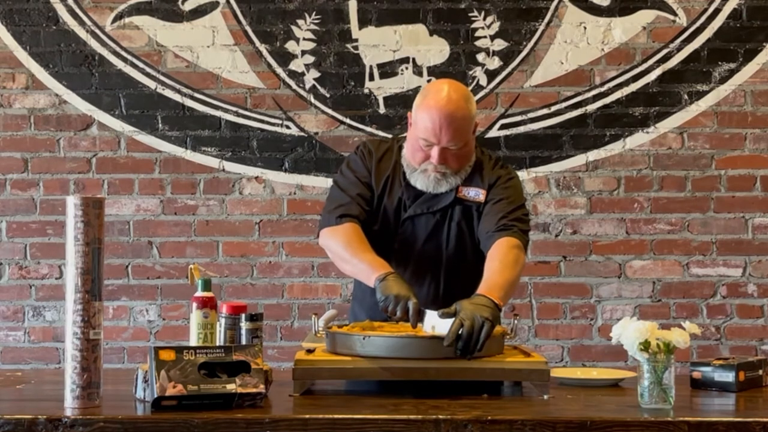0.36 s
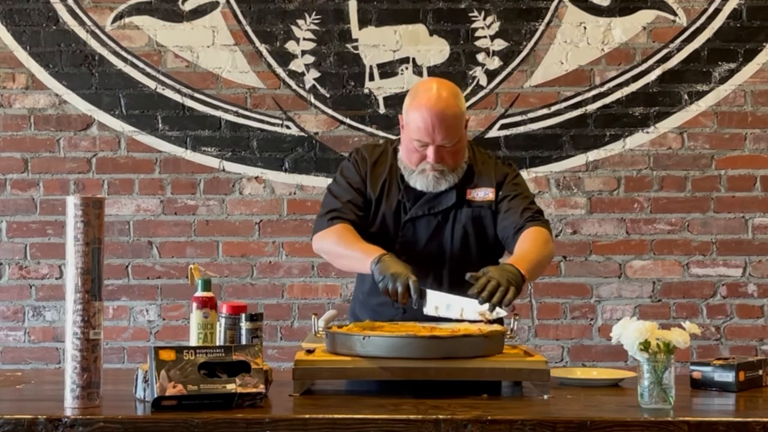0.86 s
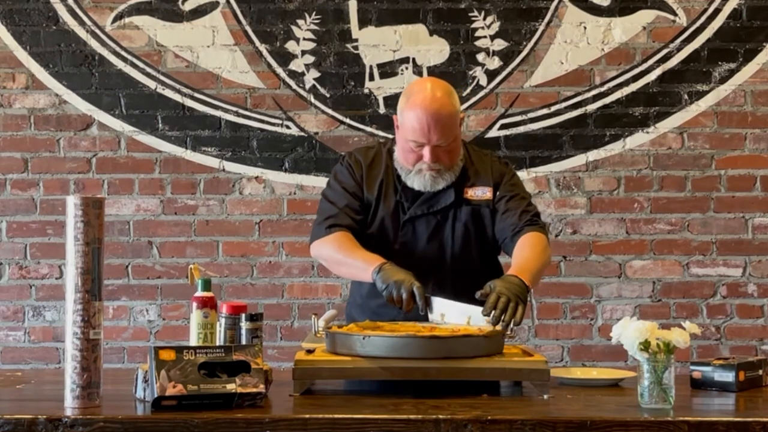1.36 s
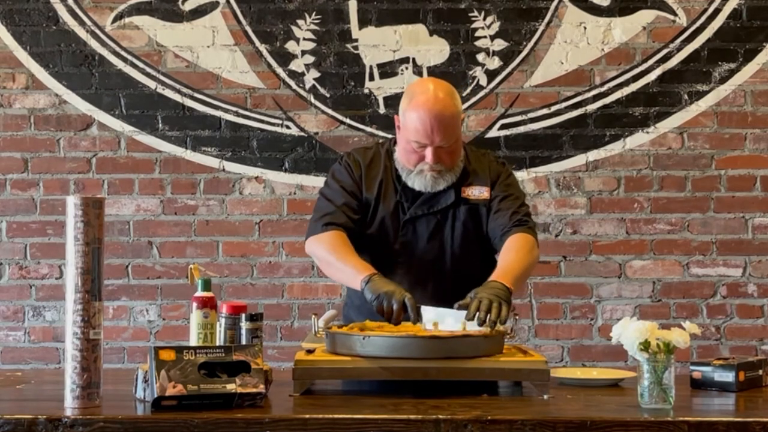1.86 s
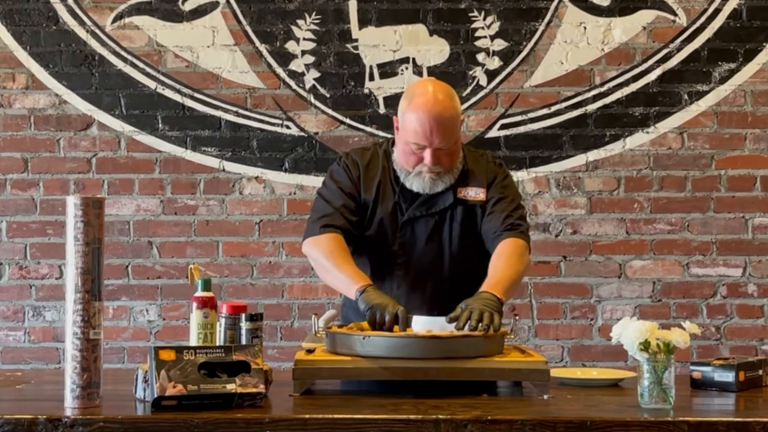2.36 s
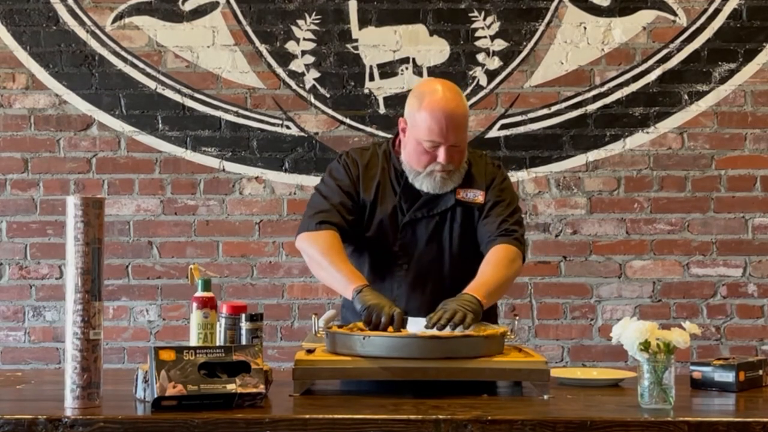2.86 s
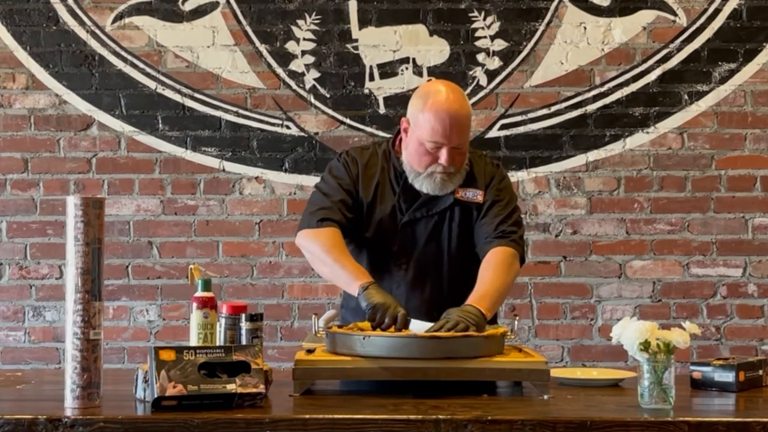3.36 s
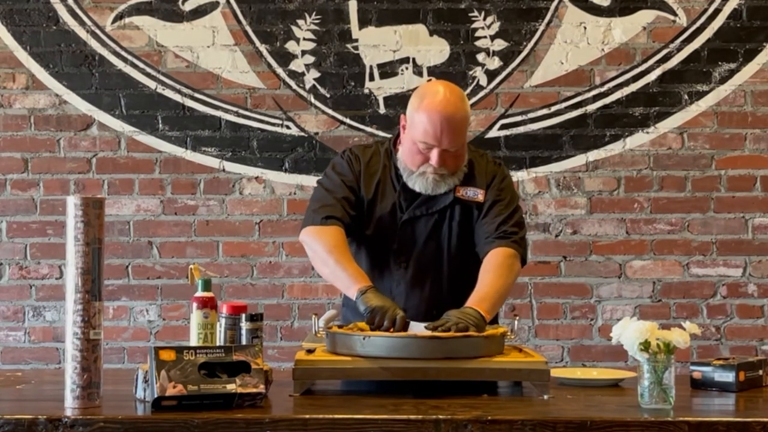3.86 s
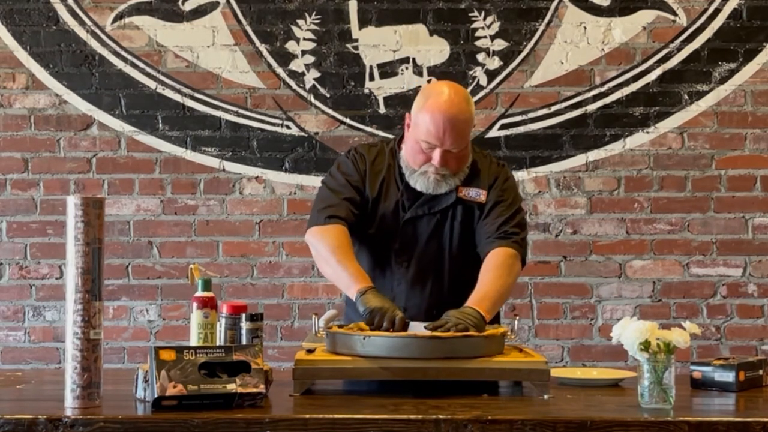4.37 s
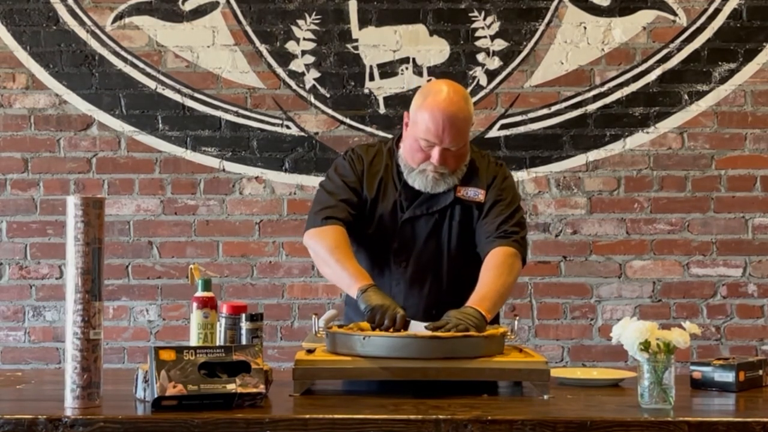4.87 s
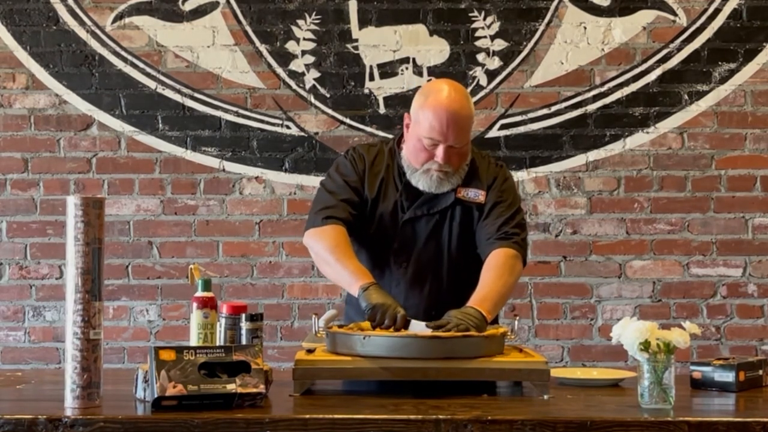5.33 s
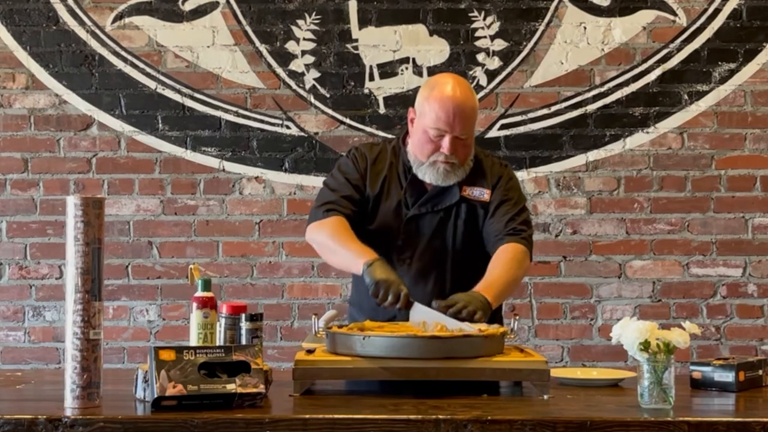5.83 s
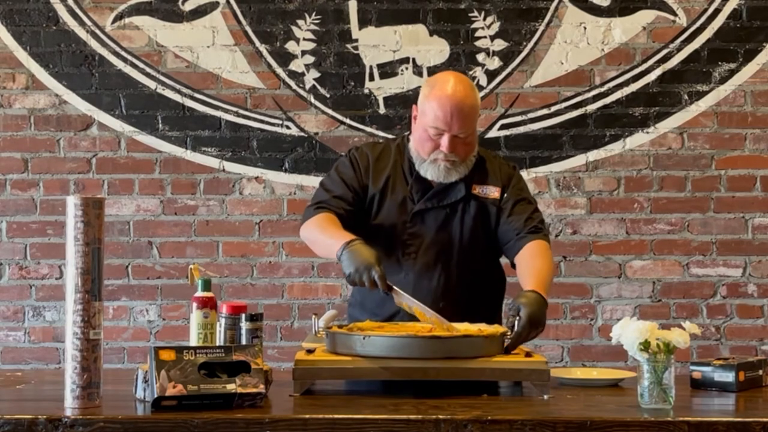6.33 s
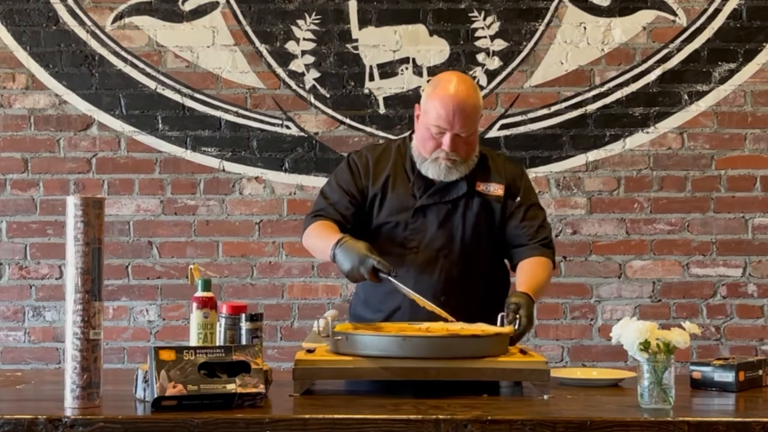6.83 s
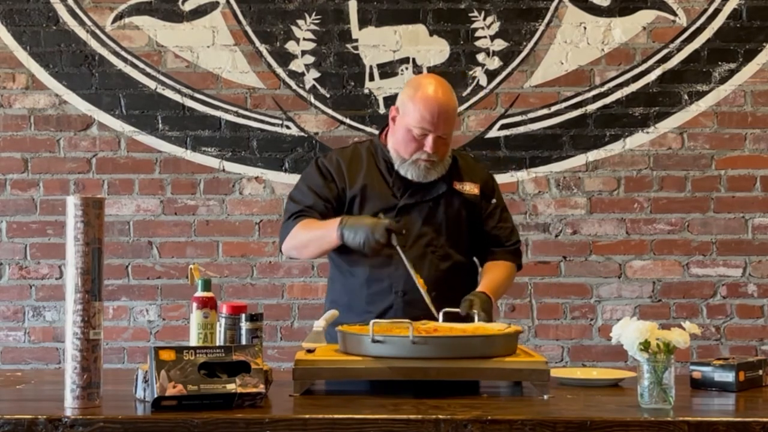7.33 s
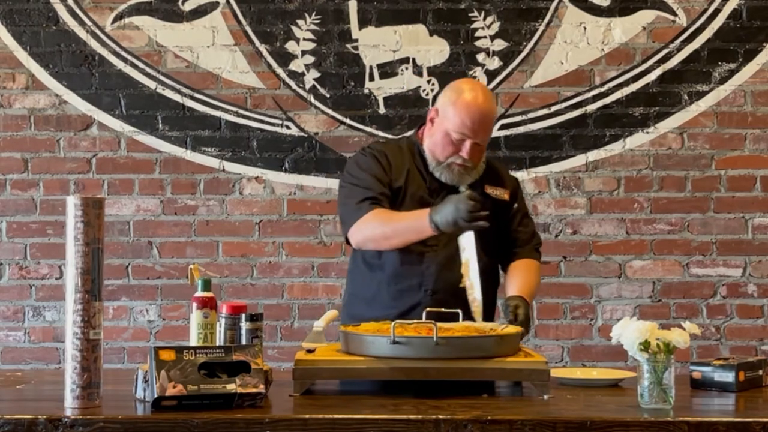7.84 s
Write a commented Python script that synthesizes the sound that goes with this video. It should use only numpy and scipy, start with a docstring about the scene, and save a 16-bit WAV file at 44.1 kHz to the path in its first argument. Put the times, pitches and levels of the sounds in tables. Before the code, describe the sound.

A deep, slowly beating fan and motor hum fills a brick-walled kitchen while a knife lightly scrapes a metal pan and the pan squeaks on wood.

```python
"""A deep, slowly beating hum runs throughout: five cooling motors turn at nearly equal speeds in a brick-walled kitchen.
Each motor is a row of steady tones at multiples of its speed; mains buzz and fan blades add more tones.
A knife slides lightly over a metal pan: rough noise, fizzing at the edge and grinding on the pan floor.
The pan shuffles on its wooden board, with squeaks and board sound made from ringing grit.
Behind it all lie fan rumble and air hiss, both shaped noise, and a pair of microphones hears it in stereo."""
import sys
import numpy as np
from scipy import signal
from scipy.fft import rfft, irfft
from scipy.io import wavfile
from scipy.ndimage import uniform_filter1d

SR = 44100
rng = np.random.default_rng(int(sys.argv[2]) if len(sys.argv) > 2 else 0)


def volts_from_db(level):
    """Convert decibel levels to linear amplitude ratios."""
    exponent = np.asarray(level, float) / 20
    return 10 ** exponent


def master_out(mix):
    """Clip the mix to full scale and print it as 16-bit PCM to the path in sys.argv[1]."""
    frames = np.transpose(np.atleast_2d(mix))
    ceiling = np.clip(frames, -1, 1)
    pcm = np.round(ceiling * 32767).astype(np.int16)
    wavfile.write(sys.argv[1], SR, pcm)


N = 351036
HZ = np.arange(N // 2 + 1) * SR / N
TIME = np.arange(N) / SR


def colour(noise, points):
    """Shape unit noise to a spectrum in dB per Hz, falling away steeply outside it."""
    hz, db = np.transpose(points)
    octave = np.log2(np.maximum(HZ, 1))
    below = np.maximum(np.log2(hz[0]) - octave, 0)
    above = np.maximum(octave - np.log2(hz[-1]), 0)
    shape_db = np.interp(octave, np.log2(hz), db) - 20.5 * (below + above)
    # unit noise is spread over SR / 2 hertz
    return irfft(rfft(noise) * volts_from_db(shape_db) * np.sqrt(SR / 2), N)


def ring(drive, hz, width_hz, steady=0.):
    """Grit heard through a resonance whose pitch may slide, with a steady part where it sings; unit rms."""
    slow = signal.lfilter(*signal.butter(2, width_hz / 2, fs=SR), drive)
    carrier = np.exp(2j * np.pi * np.cumsum(hz) / SR)
    tone = np.real((slow / slow.std() + steady) * carrier)
    return tone / tone.std()


def walk(rate):
    """Random levels, rate of them a second, smoothed twice into a wandering line of unit spread."""
    hold = int(SR / rate)
    steps = np.repeat(rng.standard_normal(N // hold + 1), hold)
    line = uniform_filter1d(uniform_filter1d(steps, hold), hold)[:N]
    return line / line.std()


def grit(scatter_db):
    """Dense catches of an edge on a rough surface, a few much bigger than the rest; unit rms."""
    catches = rng.standard_normal(N) * volts_from_db(scatter_db * rng.exponential(size=N))
    return catches / catches.std()


# turning speed of each motor shaft: f/Hz
SHAFT_HZ = [55.581, 55.906, 58.373, 58.737, 59.064]
MAINS_HZ = 59.981
# which multiples of the turning speed (or of the mains) sound: number
MULTIPLES = [1, 2, 3, 3.5, 4, 5, 6, 7, 8, 10]
# strength of each tone: a row for each shaft and a last row for the mains buzz,
# a column for each multiple: level/dB (rms; -90 means as good as absent)
TONE_DB = [(-29.3, -35, -36, -90, -45, -43, -58, -46, -62, -90),
           (-29, -62, -38, -90, -44, -45, -51, -52, -60, -90),
           (-29, -21.2, -54, -30.5, -43, -55, -44, -50, -54, -51),
           (-29.5, -50, -54, -90, -60, -60, -90, -90, -90, -90),
           (-29, -25.8, -36, -90, -42, -60, -60, -90, -90, -90),
           (-50, -22.2, -56, -90, -41, -90, -45, -90, -50, -90)]
# fan blade and casing tones: f/Hz, level/dB (rms)
BLADE_TONES = [(71.9, -36), (93.6, -37), (131.0, -41), (198.1, -39), (384.7, -46), (657.1, -52),
               (813.9, -58), (1754, -66)]
# moments when all the once-a-turn tones, then all the twice-a-turn tones, are in step: t/s
IN_STEP_S = (.289, 3.946)


def motors():
    """Steady tones of shafts, mains and blades at two nearby points; close pitches drift in and out of step and beat."""
    tones = []
    for base_hz, row in zip(SHAFT_HZ + [MAINS_HZ], TONE_DB):
        for multiple, db in zip(MULTIPLES, row):
            tones.append((multiple * base_hz, db, multiple))
    for hz, db in BLADE_TONES:
        tones.append((hz, db, 3))  # 3: given a random start, as every multiple above 2 is
    here, there = 0, 0
    for hz, db, multiple in tones:
        start, other = 2 * np.pi * rng.random(size=2)
        in_step = IN_STEP_S[min(int(multiple), 2) - 1]
        angle = 2 * np.pi * hz * (TIME - in_step) + start * (multiple > 2)
        peak = volts_from_db(db) * np.sqrt(2)
        here = here + peak * np.cos(angle)
        there = there + peak * np.cos(angle + other)
    return np.array([here, there])


# tone of the knife edge, a bright fizz: f/Hz, level/dB (per Hz, relative)
EDGE = [(5000, -8), (7000, -4.5), (9000, -1), (10500, 1.5), (11500, -3), (12300, -37.5)]
# tone of the pan floor, a grind across the middle: f/Hz, level/dB (per Hz, relative)
GRIND = [(350, -4), (700, 2.5), (1500, -6.5), (2300, -10.5), (3500, -18), (5500, -21), (8000, -27)]
# brief touches of the knife edge: peak t/s, fizz level/dB (per Hz, before the edge tone), 20 dB fade t/s
TOUCHES = [(.5, -97, .2), (.595, -87, .14), (.74, -93, .14), (1.03, -93, .25), (1.49, -93, .22),
           (3.315, -92, .26), (3.605, -93, .1), (4.255, -92, .14), (5.37, -100, .1), (5.99, -98, .4)]
TOUCH_RISE_S = .08  # time to rise by 20 dB
RESTING_DB = -105  # faint fizz of the resting blade, dB per Hz before the edge tone
# one long slide round the pan: t/s, edge fizz level/dB, pan floor grind level/dB
# (both per Hz, before the edge and pan floor tones)
SLIDE = [(6.15, -108, -92), (6.3, -98, -84), (6.46, -89, -75), (6.65, -90, -72), (6.79, -86, -70),
         (6.95, -88, -67), (7.12, -88, -68), (7.21, -84, -68), (7.33, -87, -69), (7.43, -93, -70),
         (7.6, -86, -71), (7.7, -92, -75), (7.95, -106, -79)]
# the grind while the pan shuffles: dB per Hz over the squeak level, and the time to settle
SHUFFLE_GRIND_DB, SETTLE_S = -36, .08


def knife(slip):
    """The edge catches on the metal and fizzes; in the slide and the shuffles the pan floor grinds as well."""
    at, fizz_db, grind_db = np.transpose(SLIDE)
    fizz_power = volts_from_db(RESTING_DB) ** 2 + volts_from_db(np.interp(TIME, at, fizz_db, left=-150)) ** 2
    for peak, db, fade in TOUCHES:
        drop_db = 20 * np.maximum((peak - TIME) / TOUCH_RISE_S, (TIME - peak) / fade)
        fizz_power = fizz_power + volts_from_db(db - drop_db) ** 2
    grind = volts_from_db(np.interp(TIME, at, grind_db, left=-150))
    for start, length, _, squeak_db, _ in SHUFFLES:
        end = start + length
        push = np.interp(TIME, [start - .01, start, end, end + SETTLE_S], [0, 1, .6, 0])
        grind = grind + volts_from_db(squeak_db + SHUFFLE_GRIND_DB) * push
    edge_sound = np.sqrt(fizz_power) * slip * colour(grit(0.92), EDGE)
    floor_sound = grind * slip * colour(grit(0.9), GRIND)
    return edge_sound + floor_sound


# pan shuffles: start t/s, length t/s, starting squeak f/Hz, squeak level/dB, middle board ring f/Hz
SHUFFLES = [(.582, .035, 1020, -39, 790), (3.285, .11, 1055, -36.5, 560), (5.375, .055, 1390, -43, 820),
            (5.455, .098, 1400, -41.5, 820), (6.312, .18, 1450, -40.5, 680)]
# multiples 1 to 3 of the squeak: level/dB (relative)
SQUEAK_DB = [0, -18, -22]
SAG_PER_S = .1  # the squeak sinks by this share of its pitch a second
BOARD_DB = 5  # board level over the squeak


def shuffles(slip):
    """Short rubs of pan on wood: a half-sung stick-slip squeak, and grit ringing the board."""
    out = 0
    drive = grit(1.5) + 1j * grit(1.2)
    waver = 1 + .012 * walk(40)
    for start, length, squeak_hz, squeak_db, board_hz in SHUFFLES:
        end = start + length
        push_times = [start - .004, start + .004, start + length / 2, end, end + .015]
        push = np.interp(TIME, push_times, [0, .7, 1, .9, 0])
        hz = waver * squeak_hz * (1 - SAG_PER_S * np.clip(TIME - start, 0, length))
        squeak = 0
        for k, db in enumerate(SQUEAK_DB):
            squeak = squeak + volts_from_db(db) * ring(drive, (k + 1) * hz, 110, steady=1.5)
        # the board's pitch falls during the rub
        falling_hz = np.interp(TIME, [start, end], [1.15 * board_hz, .85 * board_hz])
        board = ring(drive, falling_hz, 300)
        out = out + push * slip * volts_from_db(squeak_db) * (squeak + volts_from_db(BOARD_DB) * board)
    return out


# fan rumble: f/Hz, level/dB (per Hz, before the slow swell)
RUMBLE = [(24, -67), (33, -57), (42, -53), (51, -38.5), (64, -42.5), (75, -45.5), (94, -35.5), (106, -45.5),
          (145, -44), (190, -49), (230, -50.5), (320, -51.5), (400, -56), (800, -65)]
# air hiss: f/Hz, level/dB (per Hz, before the slight flicker)
HISS = [(500, -65.5), (850, -71), (1100, -72.5), (1800, -79), (2500, -79.5), (3100, -85.5), (3800, -84),
        (5000, -88.5), (6400, -86.5), (7600, -93), (9500, -95.5), (11200, -106), (11700, -104),
        (12200, -112)]


def fans():
    """Turbulent air as shaped noise: rumble that swells slowly and a smooth hiss that barely flickers."""
    rumble = colour(rng.standard_normal(N), RUMBLE) * volts_from_db(0.6 * walk(1.6))
    hiss = colour(rng.standard_normal(N), HISS) * volts_from_db(0.35 * walk(5.8))
    return rumble + hiss


ROOM_T60_S = 0.61  # time for the wash to fade by 60 dB
# wash against direct sound: for far things in dB (less in the deep bass), for near things as a factor
FAR_WET_DB, NEAR_WET = -5, .22


def room(far, near):
    """Direct sound plus a decaying wash off the brick, weaker for near things and for far sounds' deep bass."""
    tail = rng.standard_normal(N) * np.exp(-np.log(1000) * TIME / ROOM_T60_S)
    # unit energy in time, so about unit strength at each frequency
    tail = rfft(tail / np.linalg.norm(tail))
    wet = volts_from_db(FAR_WET_DB) / (1 + (180 / np.maximum(HZ, 1)) ** 4)
    # the far sound keeps about its overall level
    far_sound = rfft(far) * (1 + wet * tail) / np.sqrt(1 + wet ** 2)
    near_sound = rfft(near) * (1 + NEAR_WET * tail)
    return far_sound + near_sound


# microphone pair: f/Hz, likeness of the sides (-1 to 1), lead of the right side (radians),
# left minus right level/dB
PAIR = [(60, 0.98, 0, -0.3), (190, .92, 0.19, 0.2), (344, 0.31, 0.42, 0.5), (640, 0.0031, 0.086, -0.5),
        (1080, -0.45, 1.1, -1), (1490, 0.57, 0.08, -2.5), (1980, 0.43, 0.41, -1.5), (3800, 0.53, .7, -2.5),
        (5500, 0.55, 0.82, -4.5), (6400, 0.68, 1.1, -3), (7400, .45, 1.1, -2), (8100, .65, 1.1, 0)]
# the top end, nearly one signal, a third of a millisecond later on the right; same columns
PAIR_TOP = [(8600, .995, .2, 0), (10250, .995, -np.pi, 0), (11750, 1, -2 * np.pi, 0)]


def microphone_pair(shared, alone, hum, hum_alone):
    """Two microphones share part of each sound; the right one adds a part of its own where they are less alike."""
    hz, like, lead, pan_db = np.transpose(PAIR + PAIR_TOP)
    like = np.interp(HZ, hz, np.clip(like, -1, 1))
    lead = np.interp(HZ, hz, lead)
    pan_db = np.interp(HZ, hz, pan_db)
    apart = np.sqrt(1 - like ** 2)
    # the steady tones stand in a few room modes, so they differ less between the sides than noise does
    hum_right = hum + .45 * apart * hum_alone
    left = shared + hum
    right = like * np.exp(1j * lead) * shared + apart * alone + hum_right
    return irfft([left * volts_from_db(pan_db / 2), right * volts_from_db(-pan_db / 2)], N)


def scene():
    """Make each source twice: what both microphones share, and what the room brings to the right one alone."""
    knife_slip = volts_from_db(.7 * walk(30))
    pan_slip = volts_from_db(1.5 * walk(25))
    shared, alone = (room(fans(), knife(knife_slip) + shuffles(pan_slip)) for _ in range(2))
    hum, hum_alone = rfft(motors())
    return microphone_pair(shared, alone, hum, hum_alone)


def top_cut(x):
    """Nothing passes above the cut-off."""
    return signal.sosfilt(signal.butter(12, 12220, fs=SR, output="sos"), x)


def record(dry):
    """Hand on the finished mix with no change of level or tone beforehand."""
    return top_cut(dry)


dry = scene()
out = record(dry)
master_out(out)
```